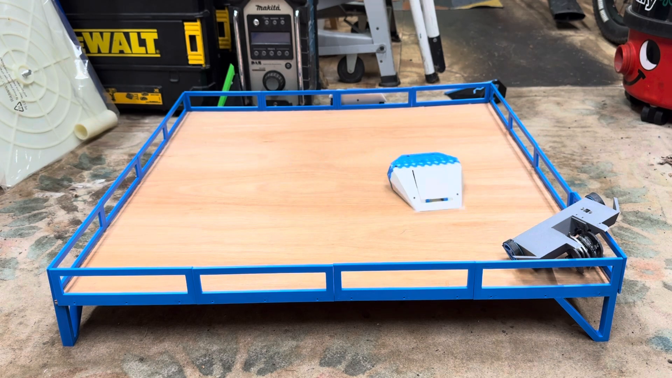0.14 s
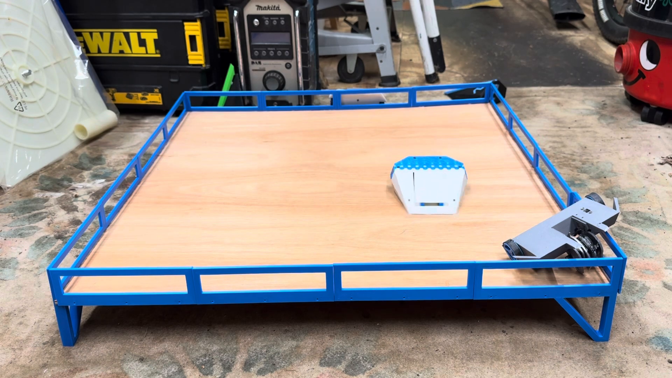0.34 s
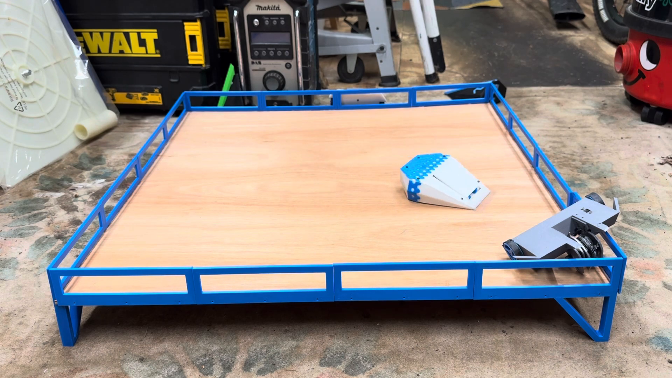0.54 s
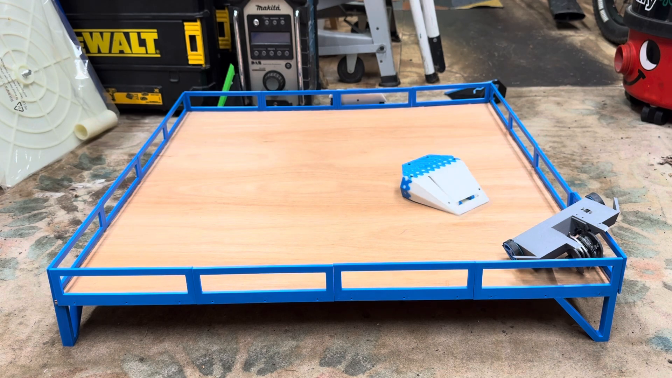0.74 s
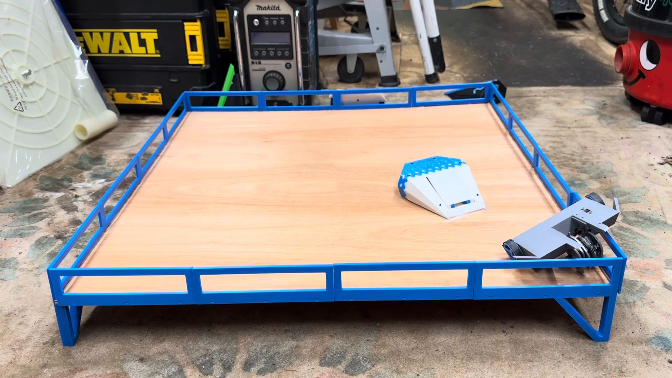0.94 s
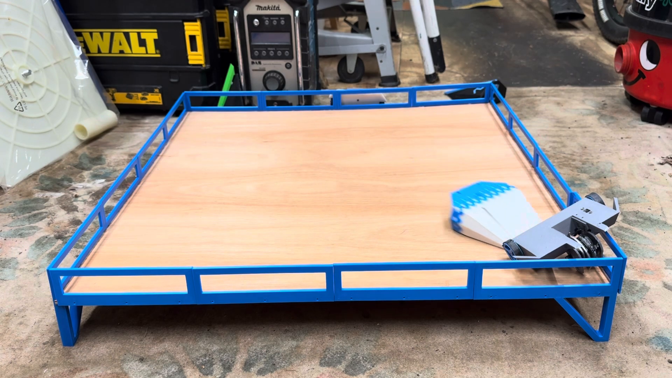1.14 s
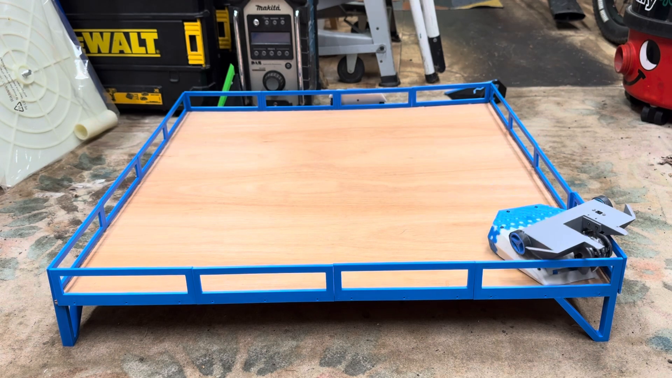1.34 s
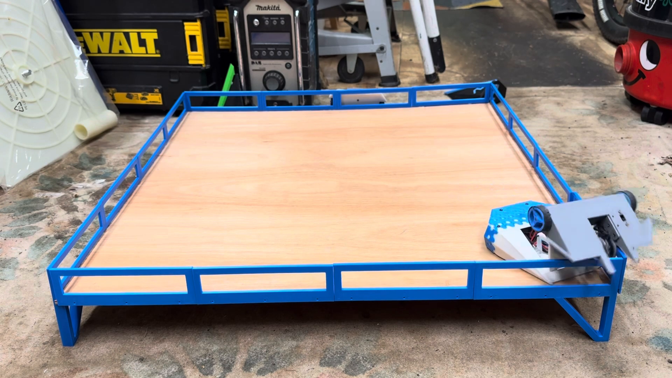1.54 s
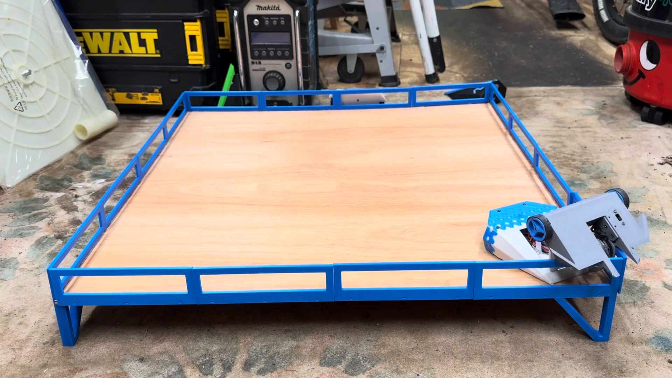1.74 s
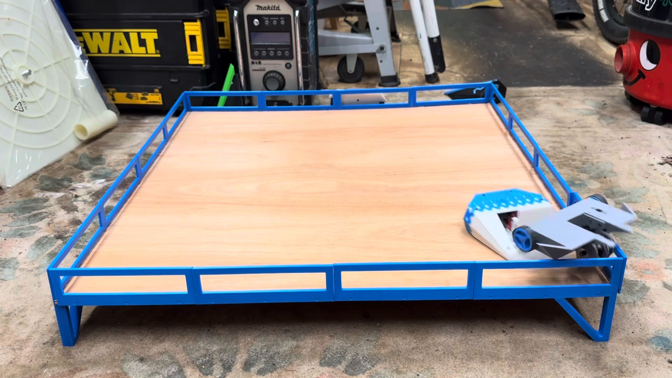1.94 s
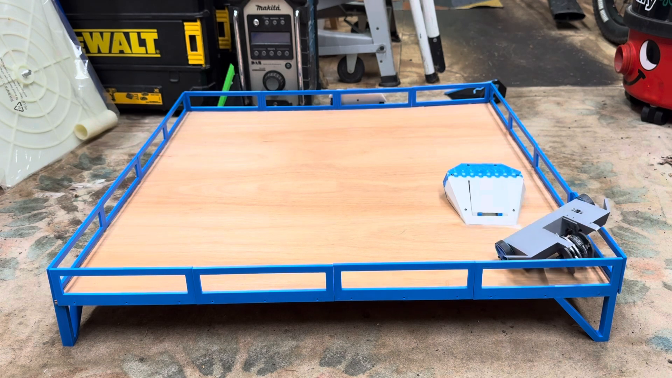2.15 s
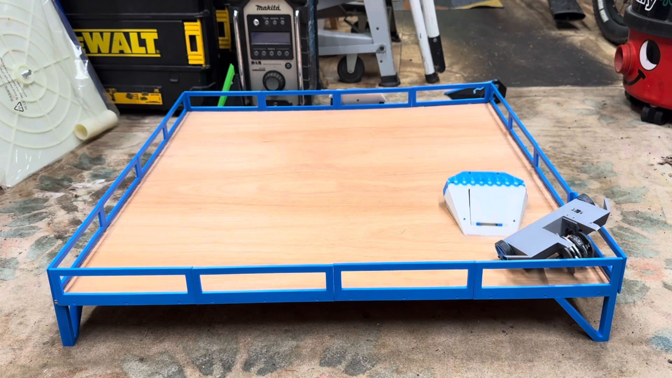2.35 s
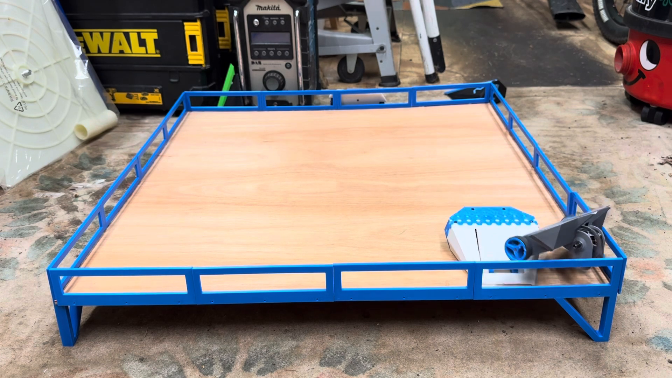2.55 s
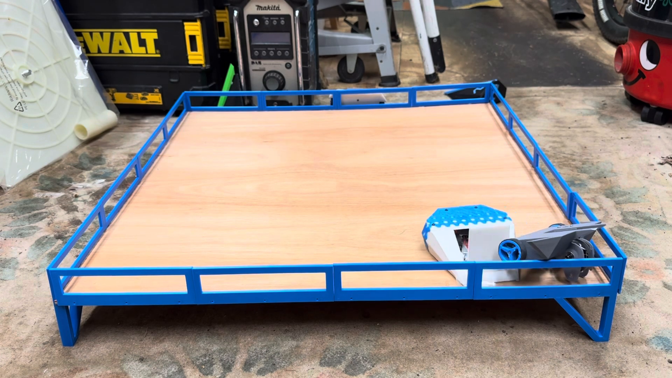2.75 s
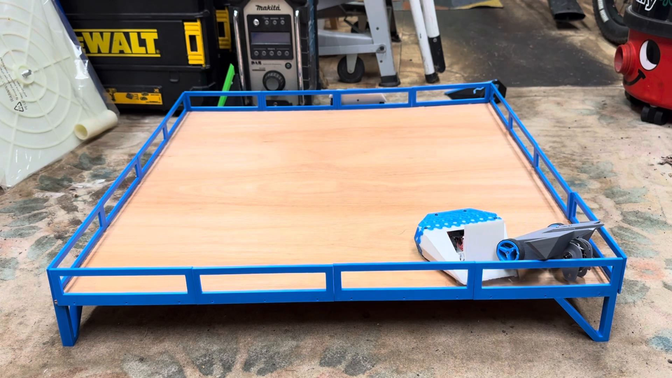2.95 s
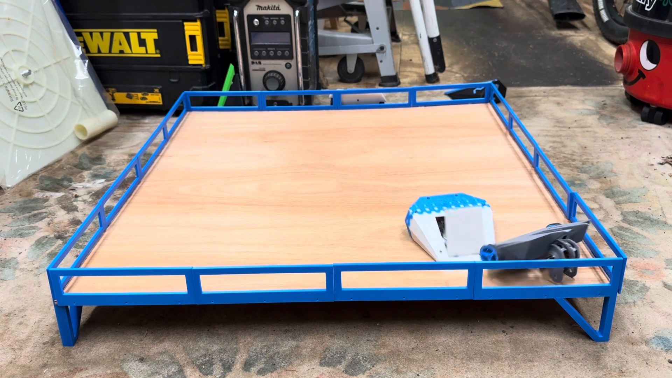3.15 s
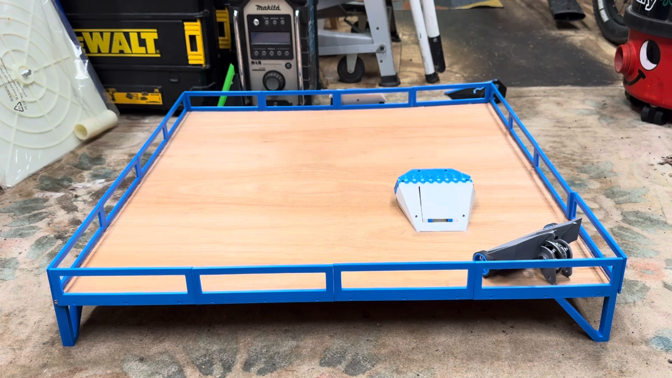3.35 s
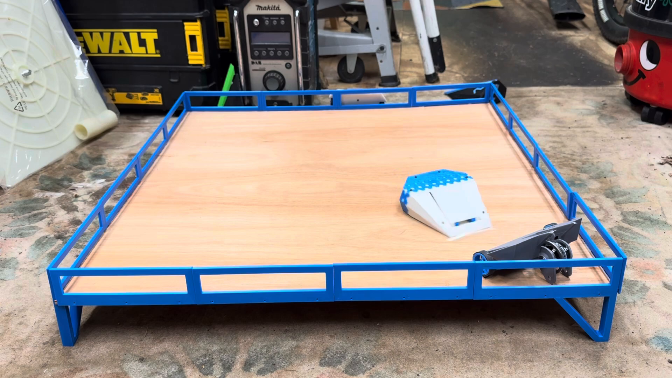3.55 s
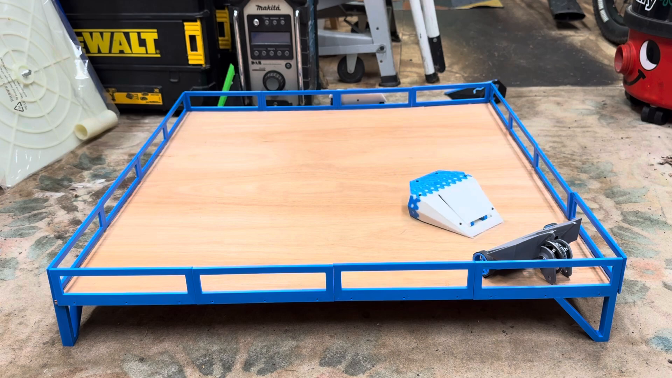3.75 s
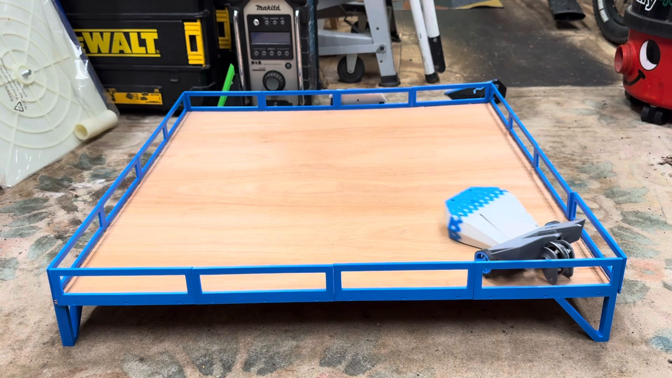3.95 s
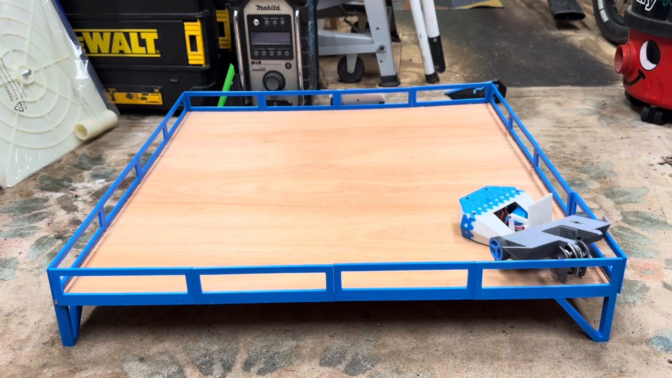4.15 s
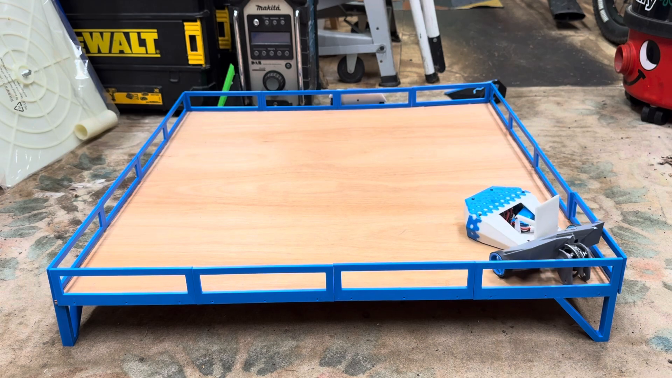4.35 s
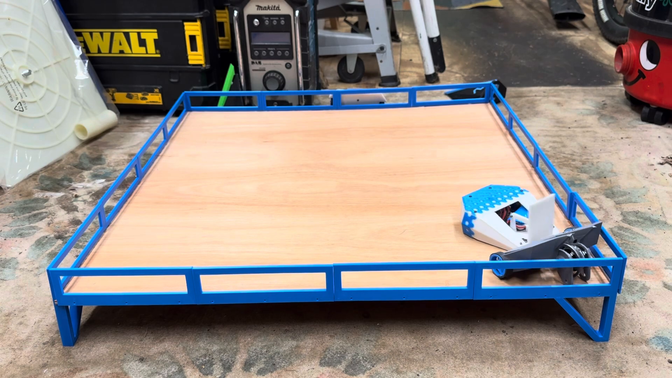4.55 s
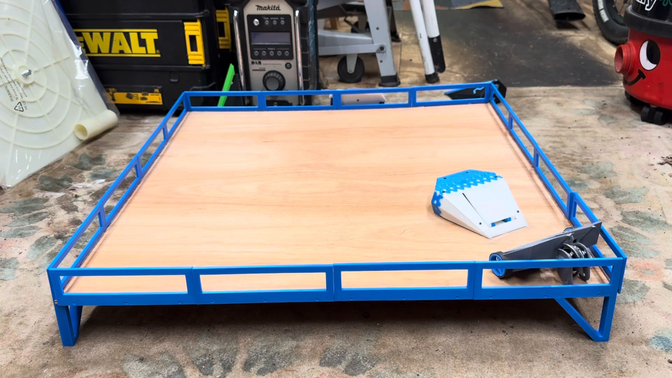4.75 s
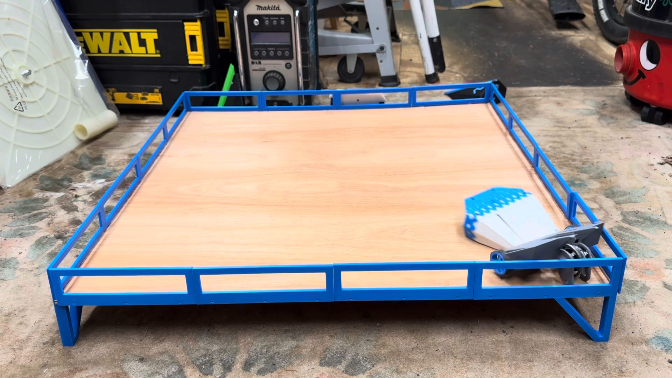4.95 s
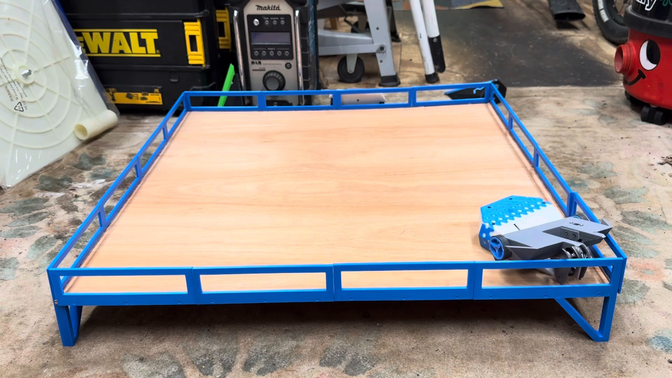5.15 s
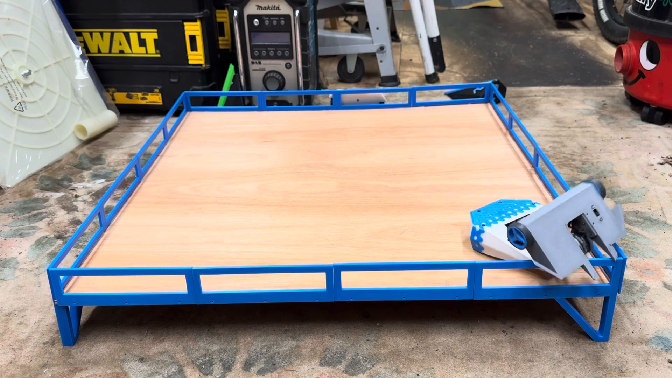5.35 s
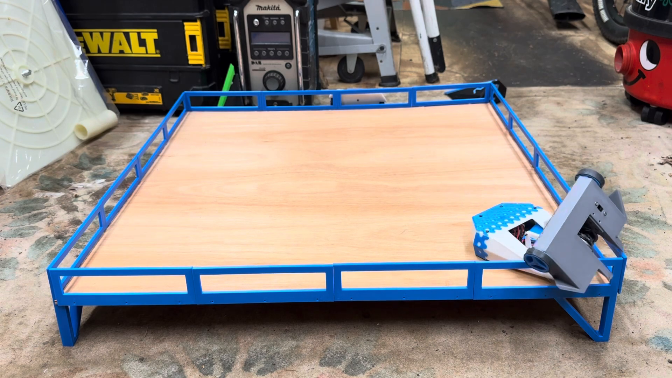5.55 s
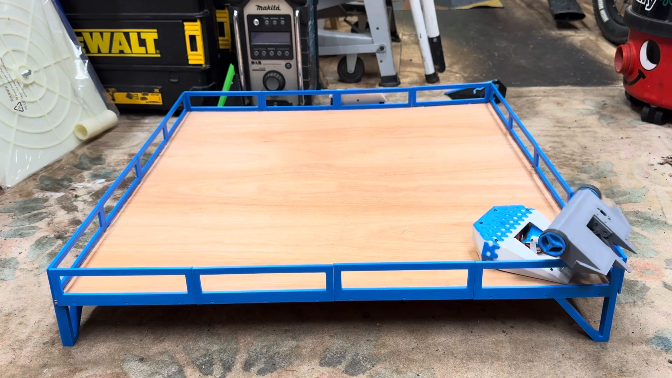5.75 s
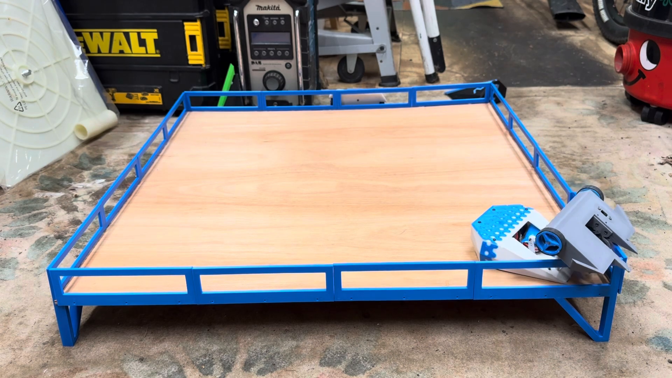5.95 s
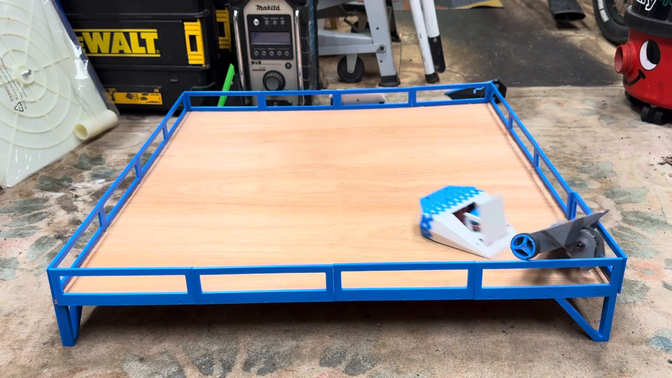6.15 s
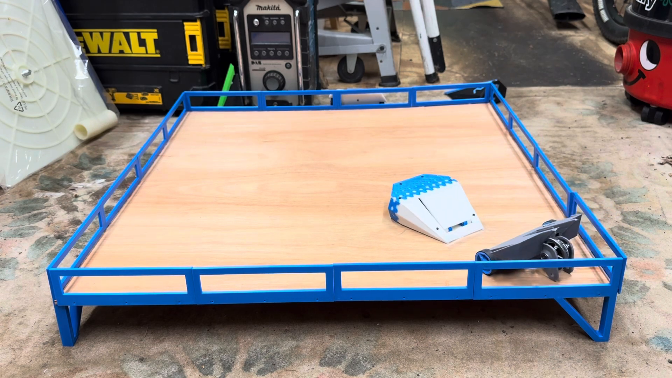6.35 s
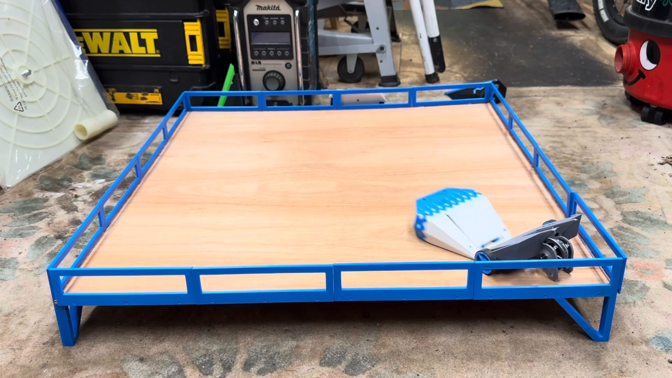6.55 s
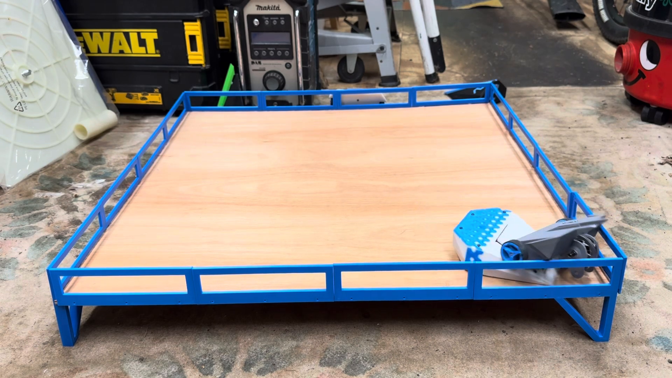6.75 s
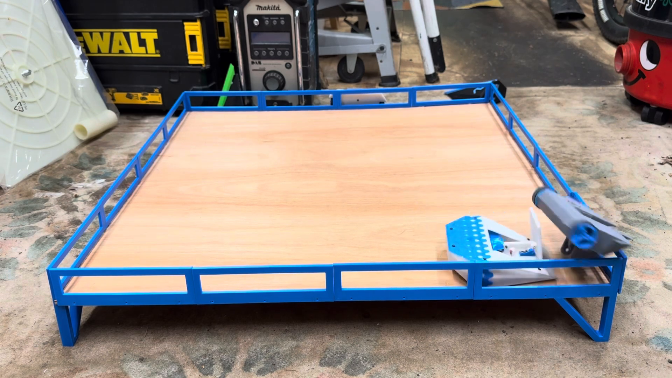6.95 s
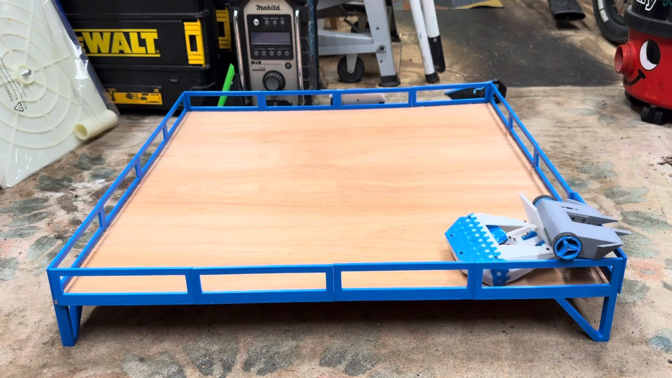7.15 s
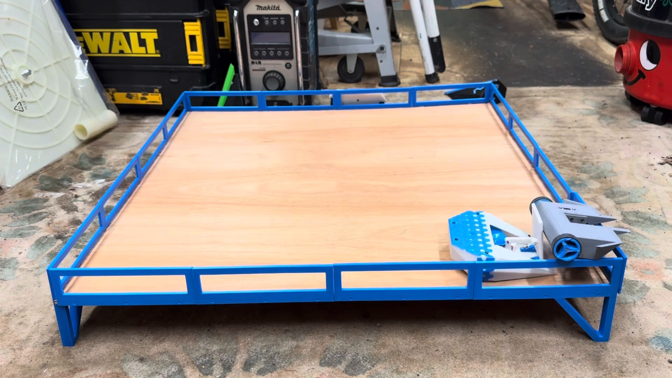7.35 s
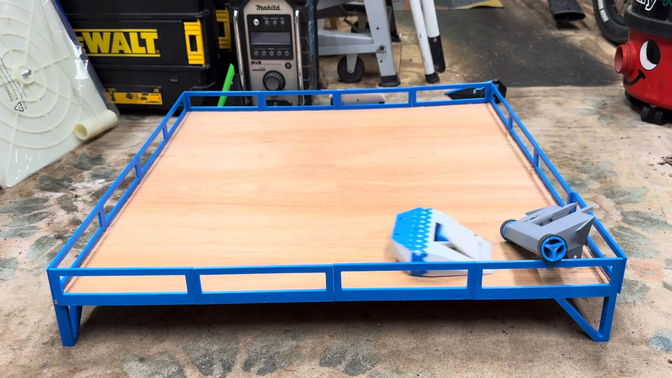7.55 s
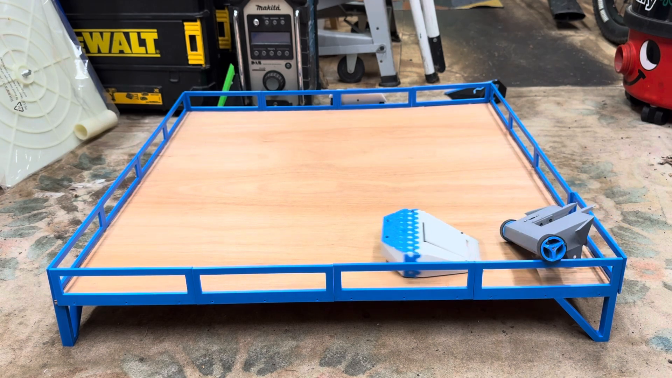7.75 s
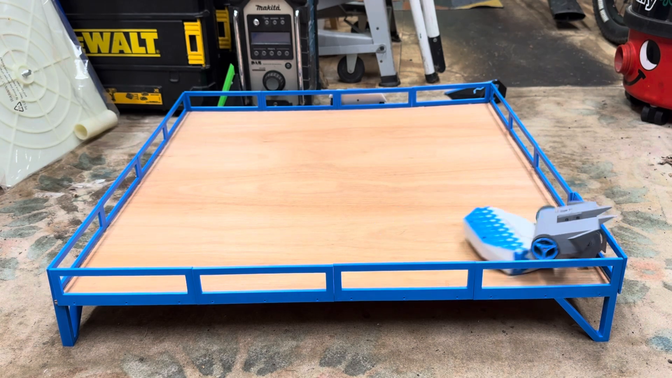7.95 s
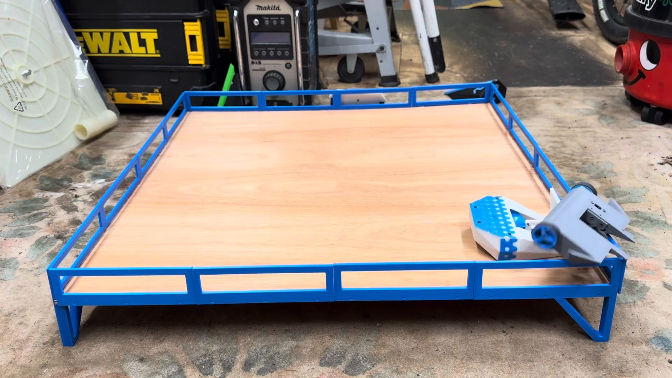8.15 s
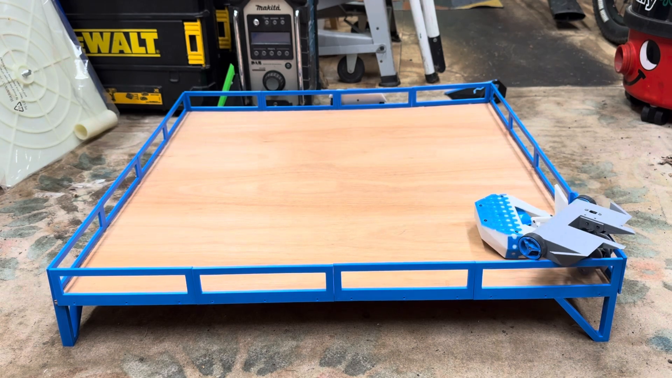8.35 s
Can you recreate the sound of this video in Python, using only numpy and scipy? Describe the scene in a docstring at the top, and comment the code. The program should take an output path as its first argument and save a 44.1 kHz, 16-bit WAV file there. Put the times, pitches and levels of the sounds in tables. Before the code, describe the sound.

Bursts of hissing gears and scrubbing wheels from small plastic robots on wood, with frequent sharp knocks and snaps as they collide.

```python
"""First comes the hiss of gears and the scrub of wheels: two small plastic robots are driving in bursts
on a thin wooden board in a garage. Tyre tread drums on the board, the plastic shells buzz, and the
motor drive whines at each new start. The robots knock, snap and clack against each other, the rail
and the board, and their slipping tyres growl. Two close microphones hear it all with a light echo."""
import sys
import numpy as np
from scipy import signal
from scipy.fft import rfft, irfft
from scipy.io import wavfile
from scipy.ndimage import uniform_filter1d

SR = 44100
rng = np.random.default_rng(int(sys.argv[2]) if len(sys.argv) > 2 else 0)


def waveform_to_disk(signal):
    """Save audio, clipped to [-1, 1], as 16-bit WAV at the path in sys.argv[1]."""
    frames = np.transpose(np.atleast_2d(signal))
    scaled = np.clip(frames, -1, 1) * 32767
    samples = np.round(scaled).astype(np.int16)
    wavfile.write(sys.argv[1], SR, samples)


N = 370440


def amp(db):
    """Turns decibels into a gain."""
    return 10 ** (np.asarray(db) / 20)

def evened(x):
    """Scales a signal to an average (rms) level of 1."""
    return x / np.sqrt(np.mean(x ** 2) + 1e-20)

def read(points, hz):
    """Looks up a pitch in a table, gliding between the rows."""
    pitch_hz, value = np.transpose(points)
    return np.interp(np.log(hz + 1), np.log(pitch_hz + 1), value)

# Pitches at which the board and robots like to ring: pitch_hz, width_hz, boost_db
RESONANCES = [(62.7, 13, 13.5), (123.4, 16, 12.5), (184.3, 16, 15), (286.5, 20, 8.5), (357, 30, 8),
              (489, 77, 6), (613, 70, -3.5), (725.7, 12, 10), (810.5, 14.7, 10.5), (889, 17, 5),
              (963, 15, 4.5), (1155, 16, 5.5), (1223, 17, 3), (1570, 48, 4.5), (1620, 12, -11),
              (1925, 84, 2), (2306, 64, 3), (3040, 30, 3.5), (3400, 22, 5.5), (3810, 28, 5.5),
              (5330, 110, 4)]
def resonate(shaking, tone, size=8192):
    """A shaken part colours the sound with its broad tone and its narrow resonances."""
    hz = abs(np.fft.fftfreq(size, 1 / SR))
    peaks = 1 + sum((amp(2 * db) - 1) / (1 + (2 * (hz - f) / width) ** 2) for f, width, db in RESONANCES)
    log_gain = np.log(amp(read(tone, hz)) * np.sqrt(np.maximum(peaks, .01)))
    phase = -signal.hilbert(log_gain).imag  # puts the ringing after the push
    taps = np.fft.ifft(np.exp(log_gain + 1j * phase)).real[:size // 2]
    return signal.oaconvolve(shaking, taps[None] / np.linalg.norm(taps), axes=1)[:, :N]

def chatter(per_s, spread_db, smooth, slip_s):
    """Rubbing noise: small uneven slips, each a short puff, over a smooth rub."""
    slips = amp(spread_db * np.minimum(rng.exponential(1, N), 2.6)) * (rng.random(N) < per_s / SR)
    puffs = evened(signal.lfilter([1], [1, -np.exp(-1 / (slip_s * SR))], slips))
    return np.sqrt(smooth ** 2 + (1 - smooth ** 2) * puffs ** 2) * rng.standard_normal((2, N))

def roaming(x, patchy_db):
    """As a robot moves and turns, some pitches are fed more and others less."""
    spectrum = signal.stft(x, nperseg=1024, noverlap=512)[2]
    patches = uniform_filter1d(rng.standard_normal(spectrum.shape[1:]), 5, axis=0)
    patches = evened(uniform_filter1d(patches, 6, axis=1))
    gain = amp(patchy_db * patches - patchy_db ** 2 * np.log(10) / 20)  # keeps the average power
    return signal.istft(spectrum * gain, nperseg=1024, noverlap=512)[1][:, :N]

# Bursts of driving: start_s, power_on_s, spin_up_s, coast_s,
# wheels_db, board_db, shell_db, gears_db, hollow_db
DRIVE_BURSTS = [(-0.1, 0.19, 0.016, 0.098, -41, -41.5, -42, -34, -57),
                (0.296, 0.13, 0.036, 0.082, -48.5, -51, -48.5, -39, -54),
                (0.647, 0.06, 0.033, 0.074, -40, -44, -43.5, -37, -47),
                (0.928, 0.79, 0.038, 0.048, -41, -51, -43, -35, -52.5),
                (1.818, 0.19, 0.04, 0.13, -42, -45, -41.5, -34, -53.5),
                (2.24, 0.7, 0.047, 0.048, -39, -48.5, -39.5, -33.5, -47.5),
                (3.037, 0.16, 0.029, 0.13, -40.5, -42.5, -39.5, -33, -45),
                (3.429, 0.13, 0.018, 0.064, -53.5, -58.5, -57, -47.5, -57.5),
                (3.756, 0.54, 0.035, 0.22, -38.5, -50, -40, -34.5, -46.5),
                (4.548, 0.05, 0.008, 0.14, -43.5, -49, -42.5, -37, -53),
                (4.761, 0.96, 0.023, 0.081, -37.5, -51.5, -41, -35, -46),
                (5.927, 0.24, 0.037, 0.14, -42.5, -46.5, -42.5, -37, -54),
                (6.412, 0.81, 0.038, 0.11, -38, -48.5, -40.5, -34.5, -44.5),
                (7.37, 0.13, 0.0051, 0.18, -37.5, -54, -49, -39, -41.5),
                (7.653, 0.67, 0.022, 0.27, -34, -51, -42.5, -35.5, -42.5)]
# Tyres slip as a robot shoves the other or the rail: middle_s, half_length_s, scrub_db, buzz_db
PUSHES = [(1.063, 0.059, 4, 5.5), (1.382, 0.12, 9, 9.5), (1.69, 0.045, 0.5, 2.5), (2.1, 0.019, 10.5, -23),
          (2.58, 0.12, 4, 4), (2.846, 0.17, 3, 1), (4.001, 0.033, 6.5, 7), (4.132, 0.034, 8.5, 6),
          (4.99, 0.05, -0.5, 2), (5.307, 0.023, 1, 6), (5.57, 0.59, 1.5, 1.3), (6.65, 0.049, 4.5, 8),
          (6.832, 0.011, 4.5, 1), (7.026, 0.043, 5.5, 7), (7.285, 0.03, 7, 8.5), (7.496, 0.11, -10, 10),
          (7.743, 0.18, 0, 1.5), (8.073, 0.044, 7, 0.5), (8.17, 0.14, -5.5, 9.5)]
def drive(part, rise, fall, scrub_share=0, buzz_share=0):
    """A part's loudness follows motor speed (rise and fall say how steeply) and changes in a shove."""
    column = ["wheels", "board", "shell", "gears", "hollow"].index(part)
    t, power = np.arange(0, N / SR + .002, .001), 0
    for start_s, on_s, up_s, coast_s, *levels_db in DRIVE_BURSTS:
        rising = (1 - np.exp(-np.maximum(t - start_s, 0) / up_s)) ** rise
        # the slower it rolls, the quicker it loses speed
        falling = np.exp(-fall * (np.maximum(t - start_s - on_s, 0) / coast_s) ** 1.42)
        power += (amp(levels_db[column]) * rising * falling) ** 2
    shove_db = sum((scrub_share * scrub_db + buzz_share * buzz_db) * np.exp(-((t - s) / half_s) ** 2)
                   for s, half_s, scrub_db, buzz_db in PUSHES)
    return np.interp(np.arange(N) / SR, t, np.sqrt(power) * amp(shove_db))

# Tone of the gears: pitch_hz, level_db
GEAR_TONE = [(2000, -43), (4200, 3), (4900, 2), (6500, 8), (11000, 6), (11800, 8), (14300, 4.5),
             (15200, -0.5), (16000, 6)]
def gear_hiss():
    """Spinning gears rub with a bright, uneven hiss."""
    rub = chatter(per_s=300, spread_db=6.5, smooth=.39, slip_s=.049)
    level = drive("gears", rise=3, fall=1.31, buzz_share=.34)
    return roaming(resonate(level * rub, GEAR_TONE), patchy_db=4.5)

# Tone of the wheels: pitch_hz, level_db
WHEEL_TONE = [(150, -56), (380, -27.5), (480, -10), (590, -2.5), (800, 0), (1300, 3.5), (1450, -21),
              (2500, -24)]
def wheel_scrub():
    """The wheels grip and slip on the wood."""
    rub = chatter(per_s=240, spread_db=1.4, smooth=.74, slip_s=.0023)
    level = drive("wheels", rise=2, fall=1.13, scrub_share=1)
    return roaming(resonate(level * rub, WHEEL_TONE), patchy_db=2)

# Tone of the thin board: pitch_hz, level_db
BOARD_TONE = [(32, -55), (52, -18.5), (92, -18.5), (140, -15.5), (240, -10.5), (330, -7.5), (420, -16),
              (600, -9), (1200, -79.5)]
def board_drumming():
    """Tyre tread drums on the board and makes it rumble."""
    rub = chatter(per_s=75, spread_db=1.7, smooth=.84, slip_s=.06)
    level = drive("board", rise=4.3, fall=1.45, buzz_share=.66)
    return roaming(resonate(level * rub, BOARD_TONE), patchy_db=3.5)

# Tone of the plastic shell: pitch_hz, level_db
SHELL_TONE = [(700, -50), (1400, 2), (2000, 3), (2600, 3.5), (3800, -2.5), (4200, -9.5), (6000, -26)]
def shell_buzz():
    """The running wheels shake the shell."""
    rub = chatter(per_s=120, spread_db=3.5, smooth=.87, slip_s=.0068)
    level = drive("shell", rise=2.66, fall=1.23, buzz_share=1)
    return roaming(resonate(level * rub, SHELL_TONE), patchy_db=3)

# Tone of the air space under the robots: pitch_hz, level_db
HOLLOW_TONE = [(250, -47.5), (340, -6), (420, -8.5), (490, 0.5), (570, -6), (680, -32.5)]
def hollow_drone():
    """The air under the robots drones while the wheels run."""
    level = drive("hollow", rise=2.9, fall=1.37, scrub_share=.92)
    return resonate(level * rng.standard_normal((2, N)), HOLLOW_TONE)

# Tone of the shell ringing after a tiny tick: pitch_hz, level_db
GRIT_TONE = [(500, -32), (880, -5), (960, -1), (1050, -8), (1165, 4), (1300, -10), (1600, -4), (1850, -14),
             (2200, -9), (2400, 3), (2650, -9), (3300, -13), (6000, -20), (9000, -36)]
def grit():
    """Single gear teeth and specks under the wheels tick into the shell."""
    ticks = chatter(per_s=260, spread_db=2.5, smooth=0, slip_s=.0004)
    level = amp(-2) * drive("shell", rise=2.66, fall=1.23, buzz_share=1)
    return resonate(level * ticks, GRIT_TONE)

# Tone of the room noise: pitch_hz, level_db
AIR_TONE = [(18, -21), (30, 1), (195, 13), (597, -27), (1690, -47), (1870, 0), (9640, 0), (15000, -28)]
def room_air():
    """Faint, steady room noise."""
    spectrum = rfft(rng.standard_normal((2, N))) * amp(read(AIR_TONE, np.fft.rfftfreq(N, 1 / SR)))
    return amp(-86) * evened(irfft(spectrum, N))

def shaken_notes(rows, sharpness, steady, rise_s, fall_db_per_s):
    """Noise shakes one pitch, which rises, holds and fades; steady (0 to 1) calms its wavering."""
    out, t = np.zeros((2, N)), np.arange(SR // 3) / SR
    for start_s, length_s, hz, db in rows:
        b, a = signal.iirpeak(hz, sharpness, SR)
        ring = signal.lfilter(b, a, signal.lfilter(b, a, rng.standard_normal((2, SR // 2))))
        ring /= (abs(signal.hilbert(ring)) + 1e-9) ** steady
        ring = evened(ring[:, len(t) // 4:][:, :len(t)])
        level = np.minimum(t / rise_s, 1) ** 2 * amp(db - fall_db_per_s * np.maximum(t - length_s, 0))
        at = round(start_s * SR)
        out[:, at:at + len(t)] += (ring * level)[:, :N - at]
    return out

# Deep notes while turning: start_s, length_s, pitch_hz, level_db
TURNS = [(0.0, .13, 373, -38.5), (0.1, 0.083, 117, -50.5), (0.37, 0.077, 344, -49),
         (2.08, 0.067, 174, -49.5)]
def turning_hum():
    """A robot turning on the spot shakes up one deep note."""
    return shaken_notes(TURNS, sharpness=15, steady=.7, rise_s=.033, fall_db_per_s=400)

# Thin whines and rings: start_s, length_s, pitch_hz, level_db
THIN_NOTES = [(0.01, .09, 3740, -50), (0.295, .03, 4600, -63), (0.42, .05, 5250, -60),
              (0.37, .05, 1580, -54), (0.735, .04, 1150, -46), (1.4, .06, 5380, -48),
              (1.56, .18, 5380, -51), (1.84, .15, 5400, -59), (3.2, .13, 5120, -57), (3.3, .09, 5250, -61),
              (3.22, .08, 5450, -52), (4.147, .02, 5400, -35), (7.7, .15, 6600, -54), (7.8, .18, 6900, -56)]
def thin_whines_and_rings():
    """Short, thin whines and rings from the gears, the motor drive and a knocked body."""
    return shaken_notes(THIN_NOTES, sharpness=32, steady=0, rise_s=.0056, fall_db_per_s=600)

# Tones of the struck frame, board, shell and small hard parts: pitch_hz, level_db
FRAME_BLOW = [(150, -28), (380, -14.5), (500, -7.5), (800, -5.5), (1200, -1), (1500, -7), (2500, -39)]
BOARD_THUMP = [(40, -51), (100, -19), (170, -13.5), (260, -4), (340, -9), (430, -4.5), (600, -12.5),
               (1200, -77)]
SHELL_CRACK = [(700, -54), (1400, 0), (2300, -0.5), (3000, 0), (4300, -4.5), (5200, -11), (7000, -40.5)]
SMALL_TICK = [(2500, -49), (4000, -2.5), (5500, 10), (7500, 3.5), (11000, 4), (14000, -51), (16000, -36)]
# Collisions: start_s, blow_db, thump_db, crack_db, tick_db, base_fade_s
BUMPS = [(0.102, -52, -55, -37, -38, 0.073), (0.441, -52, -57, -42, -42, 0.043),
         (0.738, -30, -61, -55, -53, 0.045), (0.959, -34, -60, -56, -63, 0.07),
         (1.033, -36, -57, -51, -35, 0.082), (1.194, -21, -44, -30, -50, 0.068),
         (1.223, -29, -35, -24.5, -29.5, 0.19), (1.526, -28, -65, -30.5, -51, 0.2),
         (1.657, -20.5, -56, -25, -54, 0.048), (1.844, -38, -52, -57, -40, 0.039),
         (2.027, -39, -56, -30, -50, 0.22), (2.037, -34, -53, -30, -47, 0.18),
         (2.048, -28, -25.5, -30, -46, 0.11), (2.087, -48, -38, -29.5, -35, 0.14),
         (2.312, -35, -57, -47, -39.5, 0.17), (2.47, -54, -60, -28, -34, 0.11),
         (2.483, -50, -60, -30, -41, 0.2), (2.497, -29, -40, -26, -33, 0.22),
         (2.537, -38, -38, -47, -26, 0.088), (2.596, -22, -46, -29, -47, 0.079),
         (2.691, -31.5, -57, -30.5, -45, 0.044), (3.072, -50, -58, -34, -39, 0.055),
         (3.098, -28, -38, -32, -33, 0.07), (3.193, -13, -21, -24.5, -48, 0.063),
         (3.955, -24, -22.5, -27, -44, 0.072), (4.08, -26, -57, -30, -45, 0.04),
         (4.101, -27, -50, -31, -33, 0.095), (4.203, -24, -22, -18.5, -24, 0.071),
         (4.238, -14.5, -51, -40, -39, 0.025), (4.962, -29, -27.5, -25.5, -40, 0.1),
         (5.003, -29, -52, -26, -48, 0.046), (5.051, -23, -54, -24, -51, 0.036),
         (5.255, -39, -69, -53, -90.5, 0.061), (5.288, -34, -67, -30, -45, 0.2),
         (5.345, -40, -45, -25.5, -25.5, 0.049), (5.427, -31, -55, -31, -23, 0.02),
         (5.784, -27.5, -27.5, -23, -26.5, 0.076), (6.176, -32.5, -26, -27, -29.5, 0.17),
         (6.224, -18, -63, -25, -38, 0.049), (6.292, -29.5, -41, -47, -57, 0.11),
         (6.312, -16.5, -23.5, -32, -31.5, 0.086), (6.488, -35, -56, -49, -51, 0.02),
         (6.523, -31, -55, -39, -44, 0.073), (6.595, -21, -56, -40, -30, 0.032),
         (6.622, -39, -31, -32, -47, 0.12), (6.687, -45, -53, -23.5, -45, 0.072),
         (6.705, -23.5, -26, -46, -43, 0.065), (6.774, -29, -58, -34, -56, 0.27),
         (6.809, -27, -63, -50, -52, 0.056), (6.9, -34, -66, -32, -34.5, 0.16),
         (6.97, -22, -56, -25, -54, 0.048), (6.998, -23, -47, -25, -26.5, 0.16),
         (7.084, -28.5, -38, -32.5, -43, 0.42), (7.379, -47, -25, -26.5, -46, 0.033),
         (7.516, -42, -57, -27.5, -45, 0.04), (7.735, -20.5, -28, -38, -48, 0.059),
         (7.962, -27.5, -60, -29, -35, 0.13), (7.994, -32, -37, -31, -34.5, 0.18),
         (8.075, -29, -60, -23.5, -26.5, 0.14), (8.108, -30, -36, -28.5, -25, 0.12),
         (8.178, -22, -36, -42, -34, 0.13), (8.246, -26.5, -56, -32, -32, 0.13)]
def knocks():
    """Each collision rattles four parts; each drops 60 dB in its own share of the base fade time."""
    out, t = np.zeros((2, N)), np.arange(8000) / SR
    parts = [(FRAME_BLOW, .0034, .81), (BOARD_THUMP, .0049, .57),
             (SHELL_CRACK, .0023, .98), (SMALL_TICK, .0012, 1)]
    for column, (tone, rise_s, fade_share) in enumerate(parts):
        level = np.zeros(N)
        for start_s, *peaks_db, base_fade_s in BUMPS:
            hit = amp(peaks_db[column] - 60 * t / (base_fade_s * fade_share)) * np.minimum(t / rise_s, 1)
            at = round(start_s * SR)
            level[at:at + len(t)] += hit[:N - at]
        out += resonate(level * rng.standard_normal((2, N)), tone)
    return out

# Overtones of the motor drive's whine and of the casing's whirr: pitch_multiple, level_db
WHINE_TONES = [(1, 0), (2, -5), (3, -5), (4, -8), (5, -12), (6, -7), (7, -8), (8, -14)]
WHIRR_TONES = [(1, 0), (2, -8), (3, -7)]
def motor_whine(switch_hz=927, hold_s=.11, whirr_peak_s=.021):
    """The drive switches its power rapidly: at each start it whines and shakes the casing into a whirr."""
    out, t = np.zeros((2, N + SR)), np.arange(SR // 4) / SR
    shake, whirrs = rng.standard_normal((len(DRIVE_BURSTS), 2, len(t))), 0
    for k, db in WHIRR_TONES:
        b, a = signal.iirpeak(k * switch_hz, 9 * k, SR)
        whirrs += amp(db) * evened(signal.lfilter(b, a, signal.lfilter(b, a, shake)))
    level = amp(-66 - 19 * np.maximum(t / hold_s - 1, 0)) * np.minimum(t / .004, 1)
    swell = (t / whirr_peak_s * np.exp(1 - t / whirr_peak_s)) ** 1.5
    # the first burst is already under way, so it has no whine
    for (start_s, _, _, _, wheels_db, *_), whirr in zip(DRIVE_BURSTS[1:], whirrs):
        flicker = amp(2 * evened(uniform_filter1d(rng.standard_normal(len(t)), size=90)))
        tones = 0
        for k, db in WHINE_TONES:
            gain = amp(db + 2 * rng.standard_normal())
            tones += gain * np.sin(2 * np.pi * (k * switch_hz * t + rng.random((2, 1))))
        whine = level * flicker * tones + amp(wheels_db - 14) * swell * whirr
        out[:, round(start_s * SR):][:, :len(t)] += whine
    return out[:, :N]

# Growls of the frame: start_s, length_s, pitch_hz, level_db
TYRE_GROWLS = [(1.02, 0.13, 1110, -43), (1.22, 0.11, 1580, -43), (1.32, .15, 1195, -35.5),
               (1.34, 0.045, 886, -39), (1.57, .05, 1160, -40), (1.64, 0.048, 490, -41),
               (2.26, 0.18, 880, -51), (2.57, 0.093, 1110, -48), (2.63, 0.047, 500, -51),
               (2.72, 0.041, 820, -38), (2.86, .1, 790, -41), (3.46, 0.077, 2460, -52.5),
               (3.86, 0.16, 900, -43), (4.07, .08, 1170, -41), (4.22, .04, 1200, -45),
               (4.87, 0.049, 840, -39), (4.95, .1, 496, -46), (5.29, 0.1, 482, -42),
               (5.44, 0.066, 1220, -34.5), (5.5, 0.09, 760, -52), (5.66, 0.054, 500, -41.5),
               (5.72, 0.1, 1180, -41.5), (6.62, 0.065, 868, -31), (6.67, 0.02, 800, -29),
               (6.78, 0.1, 807, -33.5), (7.09, 0.061, 710, -48), (7.15, 0.19, 495, -45),
               (7.47, 0.067, 2380, -45), (7.75, 0.13, 813, -41), (7.95, .12, 796, -45),
               (7.96, 0.22, 1226, -45)]
def tyre_growls():
    """Slipping tyres keep the frame ringing roughly at one pitch."""
    return shaken_notes(TYRE_GROWLS, sharpness=9, steady=.15, rise_s=.025, fall_db_per_s=400)

# Tone of a snap: pitch_hz, level_db
SNAP_TONE = [(1000, -35), (2200, 7.5), (6000, 4), (11000, 13), (15500, -7)]
# Edges hitting: start_s, level_db
EDGE_HITS = [(1.222, -23), (1.844, -41), (2.533, -25), (3.074, -35), (4.204, -14), (5.784, -44),
             (7.379, -30), (7.998, -23.5)]
def edge_snaps(fade_s=.026, spike_db=5, spike_s=.0006):
    """Hard edge meets hard edge with a very short, bright crack."""
    cracks, t = np.zeros((2, N)), np.arange(SR // 20) / SR
    for start_s, db in EDGE_HITS:
        level = amp(db - 60 * t / fade_s + spike_db * np.exp(-t / spike_s))
        cracks[:, round(start_s * SR):][:, :len(t)] += level * rng.standard_normal((2, len(t)))
    return resonate(cracks, SNAP_TONE)

# Notes of the plastic bodies: pitch_hz, level_db
PLASTIC_NOTES = [(375, -0.5), (478, -1.5), (720, -5), (800, -10), (878, -3), (965, -1), (1225, 1.5),
                 (1640, 1), (1920, -2), (2350, 7), (2650, -2.5), (3000, -3), (3540, -11), (3880, -6),
                 (4400, -16), (5400, -1), (6600, 0)]
# Clean hits: start_s, level_db, centre_hz, fade_s (time to drop 60 dB at the centre pitch)
CLEAN_HITS = [(1.224, -24, 1600, 0.088), (1.656, -34, 1210, .05), (2.048, -24.5, 1190, 0.13),
              (2.09, -35, 2300, .06), (2.5, -32, 1900, 0.069), (2.539, -37, 6000, .07),
              (2.573, -25, 1000, 0.068), (2.693, -32, 2400, 0.041), (2.717, -24, 2400, 0.057),
              (2.745, -23, 1000, 0.045), (3.074, -39, 2600, .04), (3.098, -27, 810, 0.081),
              (3.194, -14.5, 2380, 0.026), (3.197, -16, 1210, 0.078), (3.954, -22, 1000, .06),
              (4.082, -23.5, 1100, 0.056), (4.204, -18.5, 1170, 0.088), (5.049, -24, 1000, .06),
              (5.255, -24, 1140, 0.083), (5.783, -30.5, 2700, 0.089), (5.789, -26, 5800, 0.073),
              (6.177, -27, 2800, .09), (6.221, -29, 1600, .05), (6.293, -29, 1790, 0.052),
              (6.312, -20, 1180, 0.14), (6.596, -21, 1000, 0.044), (6.688, -23, 3500, .05),
              (6.707, -22, 2000, 0.042), (6.998, -25, 704, 0.092), (6.998, -23, 1800, .07),
              (7.378, -38, 1200, .05), (8.083, -21, 1090, .06), (8.11, -30, 2300, .06),
              (8.178, -31, 1200, 0.055)]
def plastic_clacks(width_octaves=.55, rise_s=.0025, spread_db=3):
    """A clean hit rings the body's notes near one centre pitch; higher notes die sooner."""
    out, t = np.zeros((2, N + SR)), np.arange(SR // 8) / SR
    hz, note_db = np.transpose(PLASTIC_NOTES)[:, :, None]
    for start_s, db, centre_hz, fade_s in CLEAN_HITS:
        luck, phase = rng.standard_normal((2, 2, len(hz), 1))
        gain = amp(note_db - 5.1 * (np.log2(hz / centre_hz) / width_octaves) ** 2)
        ring = gain / np.linalg.norm(gain) * amp(spread_db * luck) * np.sin(2 * np.pi * hz * t + phase)
        level = amp(db - 60 * t / fade_s * np.sqrt(hz / centre_hz)) * np.minimum(t / rise_s, 1)
        out[:, round(start_s * SR):][:, :len(t)] += (ring * level).sum(axis=1)
    return out[:, :N]

# Time the garage's echo takes to drop 60 dB: pitch_hz, fade_s
ECHO_FADE = [(100, 0.54), (300, 0.37), (800, 0.12), (2000, 0.089), (5000, 0.18), (13000, 0.029)]
def garage_echo(x):
    """Many small reflections blur into a tail in which each pitch dies at its own speed."""
    taps = np.zeros((2, SR // 2))
    at = np.arange(200, SR // 2 - 20, 20) + rng.integers(0, 20, (2, (SR // 2 - 201) // 20))
    np.put_along_axis(taps, at, rng.choice([-1., 1.], at.shape), 1)
    hz, t, spectrum = signal.stft(taps, SR, nperseg=256)
    tail = signal.istft(spectrum * amp(-60 * t / read(ECHO_FADE, hz)[:, None]), SR, nperseg=256)[1]
    return signal.oaconvolve(x, tail / np.linalg.norm(tail[0]), axes=1)[:, :N]

def scene():
    """The robots, their echo in the garage and the room noise."""
    robots = gear_hiss() + wheel_scrub() + board_drumming() + shell_buzz() + hollow_drone() + grit()
    robots += turning_hum() + thin_whines_and_rings() + knocks() + motor_whine()
    robots += tyre_growls() + edge_snaps() + plastic_clacks()
    return robots + amp(-11) * garage_echo(robots) + room_air()

# How alike the two microphones sound: pitch_hz, likeness_0_to_1
MIC_LIKENESS = [(60, .97), (200, .975), (350, .965), (600, .82), (1100, .45), (1700, .65), (2600, .8),
                (3300, .45), (5000, .3), (6200, .05), (7500, .5), (8400, .92), (9600, .9), (12400, .55),
                (15500, .85)]
# How far the left one is ahead: pitch_hz, lead_radians
LEFT_LEAD = [(30, 0), (300, 0), (780, -.3), (1380, -1.1), (1640, -.5), (3790, .5), (5600, -1.3), (7670, 3),
             (11400, 2.5), (14300, .8), (15000, .1)]
# How much louder the left one is: pitch_hz, louder_db
LEFT_LOUDER = [(60, 1.3), (140, 1), (330, 2.5), (500, 3.3), (770, 2), (1170, 0), (1790, -1), (2740, -.5),
               (4190, 1.5), (6410, 3), (9810, .5), (15000, 0)]
def record(dry, cutoff_hz=15950):
    """Two close microphones share part of the sound, slightly out of step; the top treble is cut."""
    hz, (left, other) = np.fft.rfftfreq(N, 1 / SR), rfft(dry)
    likeness, tilt = read(MIC_LIKENESS, hz), amp(read(LEFT_LOUDER, hz) / 2)
    right = likeness * left * np.exp(-1j * read(LEFT_LEAD, hz)) + np.sqrt(1 - likeness ** 2) * other
    mics = amp(-1.13) * irfft(np.array([left * tilt, right / tilt]), N)
    lowpass = signal.firwin(511, cutoff_hz, window=("kaiser", 9), fs=SR)
    return signal.oaconvolve(mics, lowpass[None], "same")


dry = scene()
out = record(dry)
waveform_to_disk(out)
```